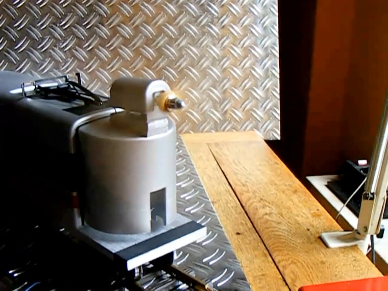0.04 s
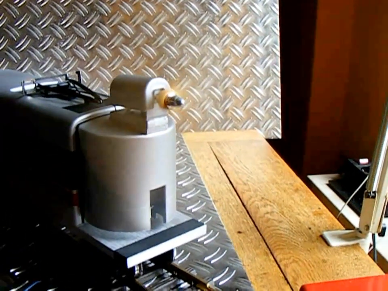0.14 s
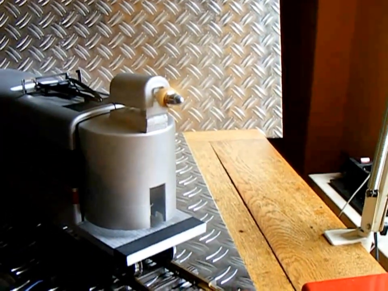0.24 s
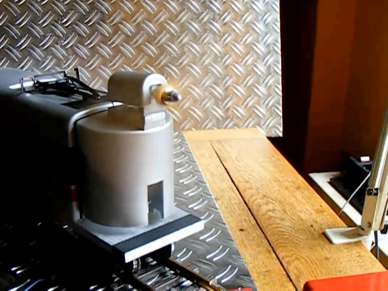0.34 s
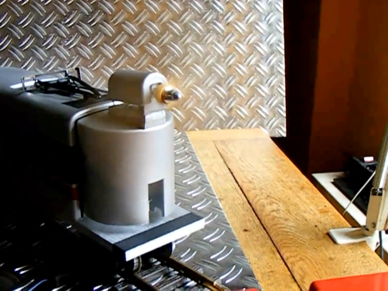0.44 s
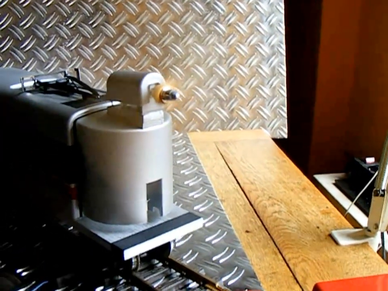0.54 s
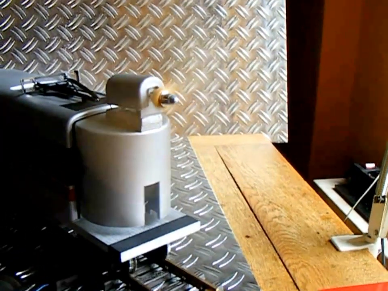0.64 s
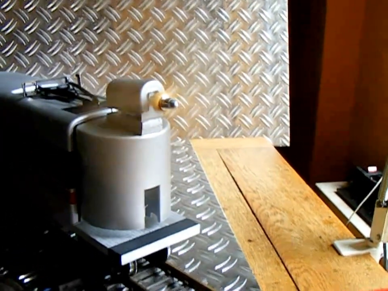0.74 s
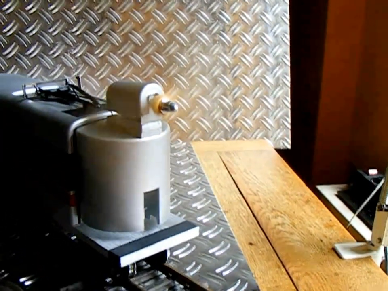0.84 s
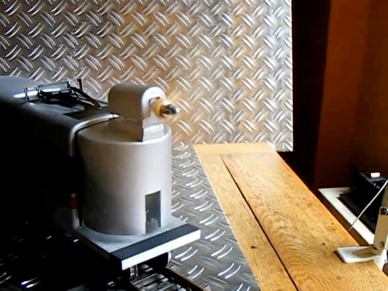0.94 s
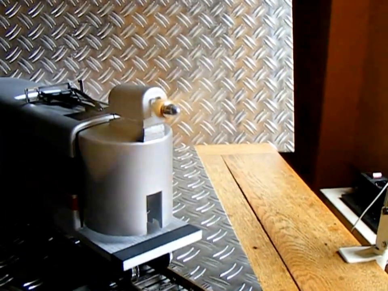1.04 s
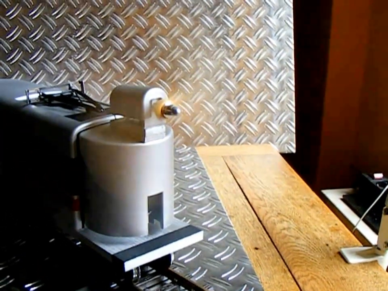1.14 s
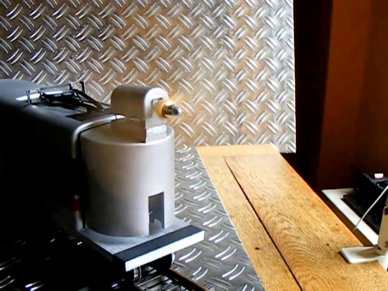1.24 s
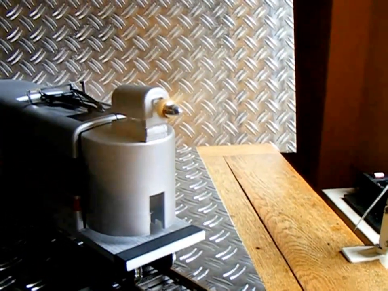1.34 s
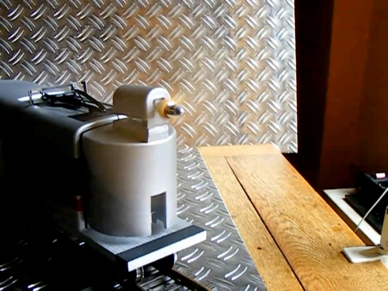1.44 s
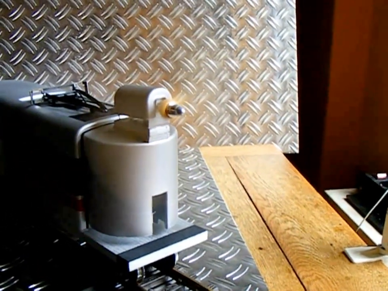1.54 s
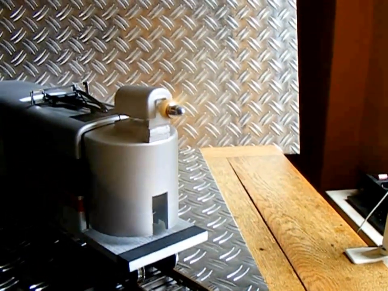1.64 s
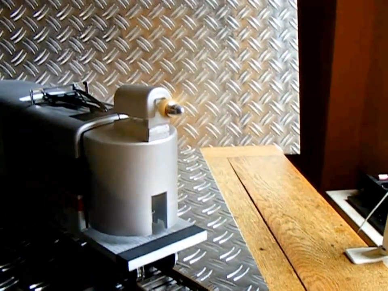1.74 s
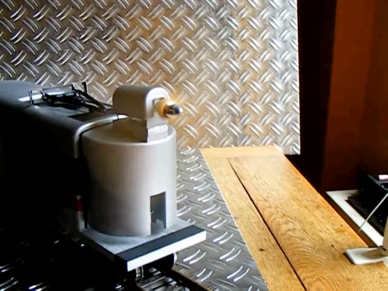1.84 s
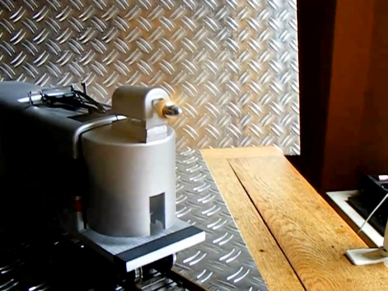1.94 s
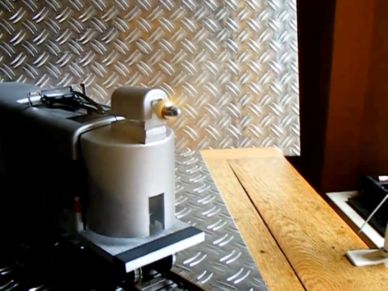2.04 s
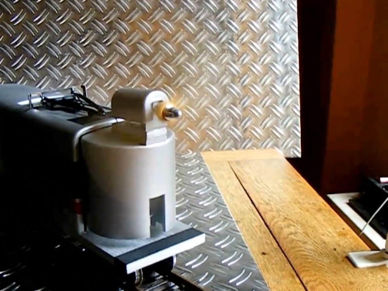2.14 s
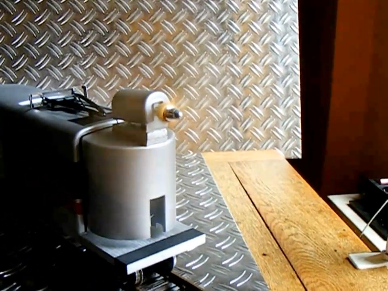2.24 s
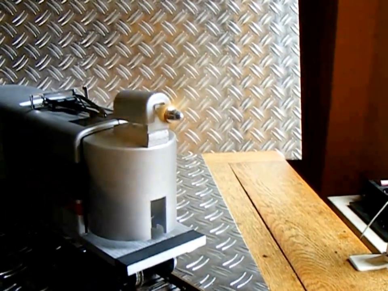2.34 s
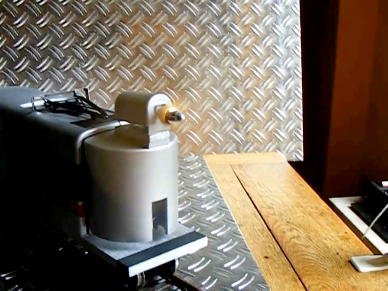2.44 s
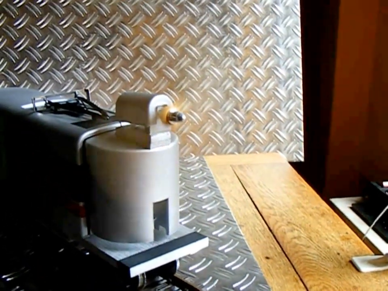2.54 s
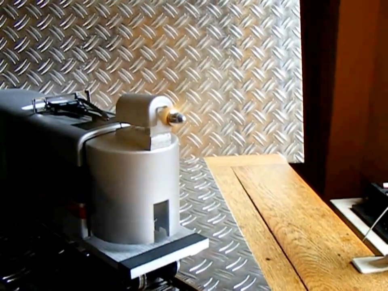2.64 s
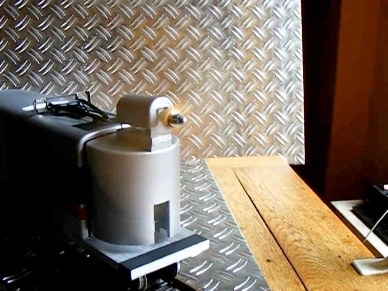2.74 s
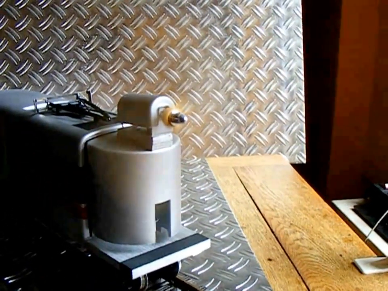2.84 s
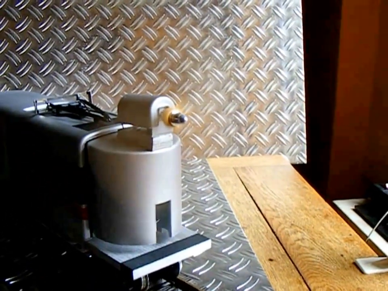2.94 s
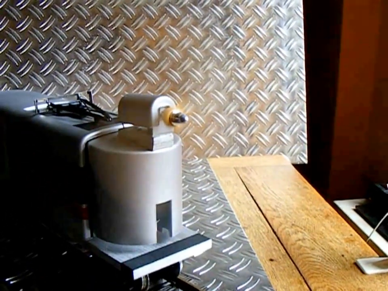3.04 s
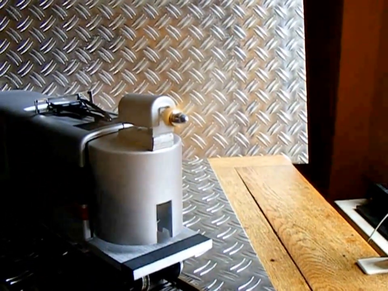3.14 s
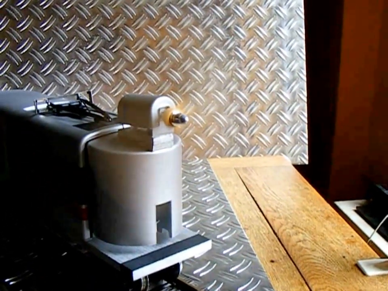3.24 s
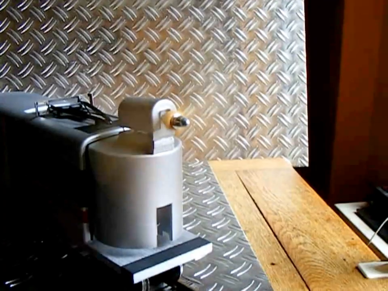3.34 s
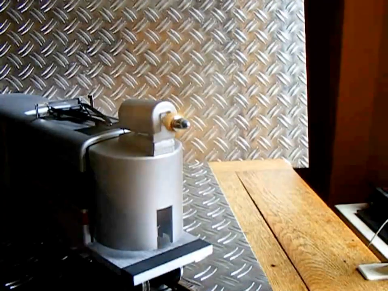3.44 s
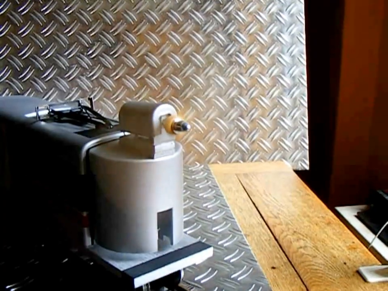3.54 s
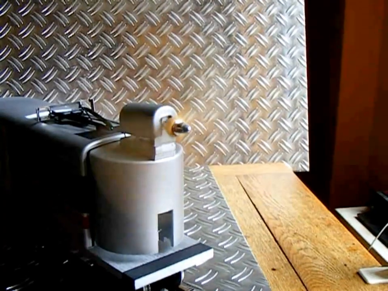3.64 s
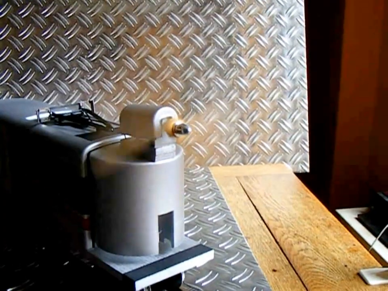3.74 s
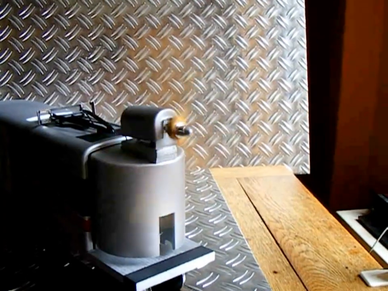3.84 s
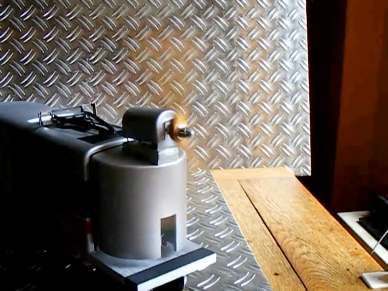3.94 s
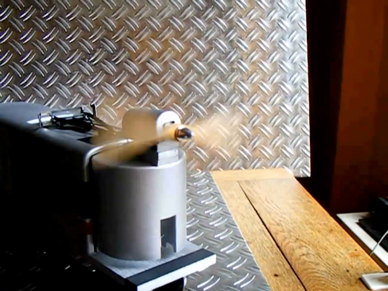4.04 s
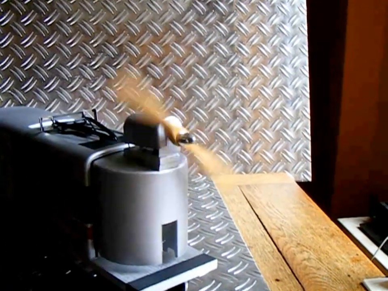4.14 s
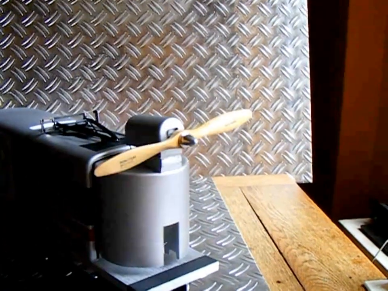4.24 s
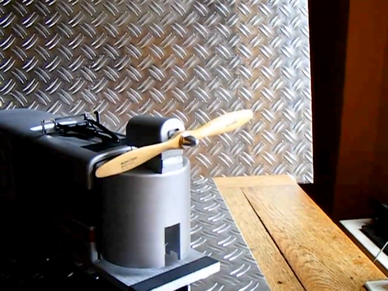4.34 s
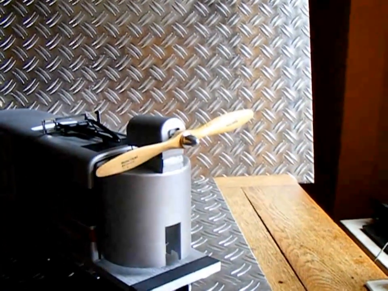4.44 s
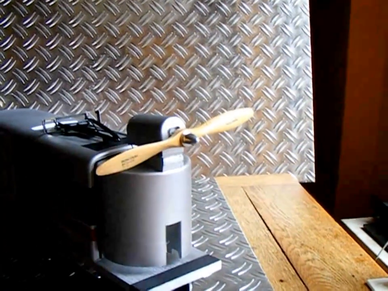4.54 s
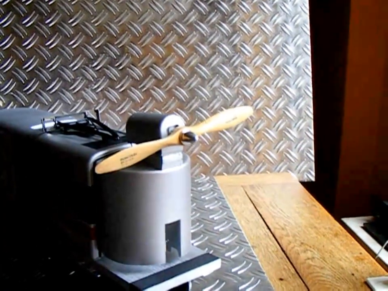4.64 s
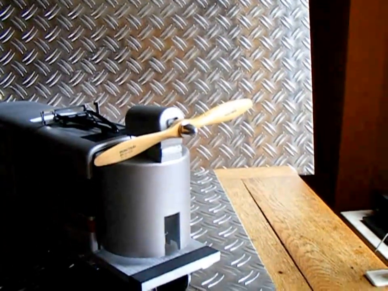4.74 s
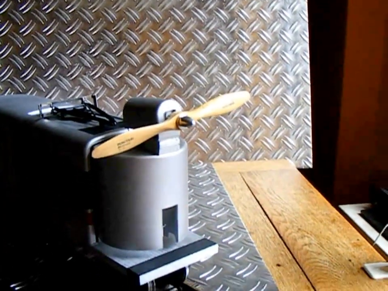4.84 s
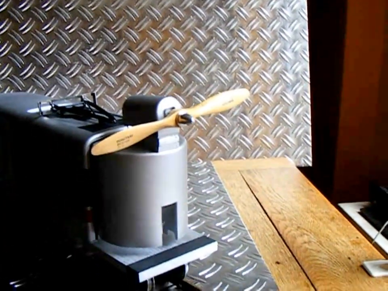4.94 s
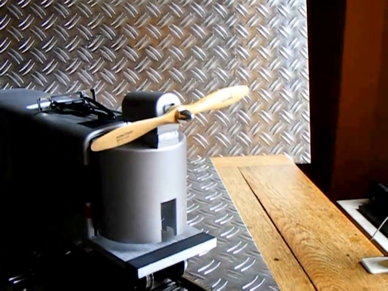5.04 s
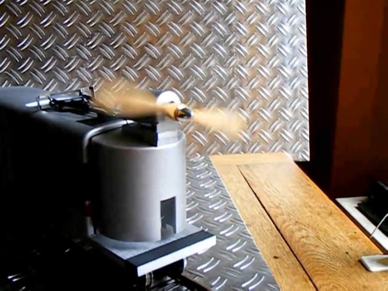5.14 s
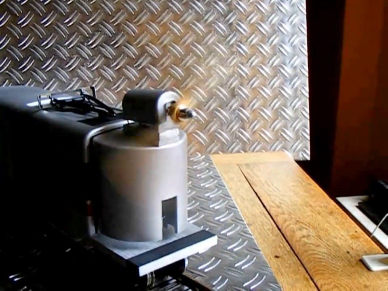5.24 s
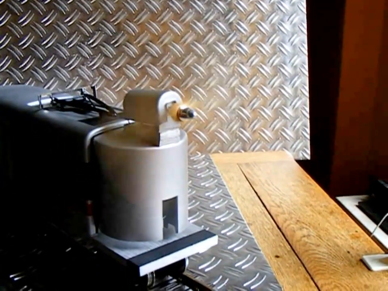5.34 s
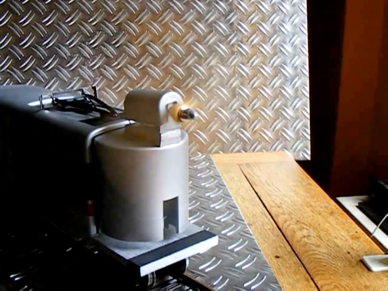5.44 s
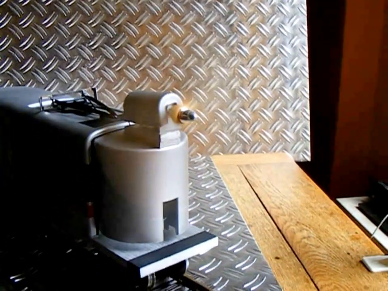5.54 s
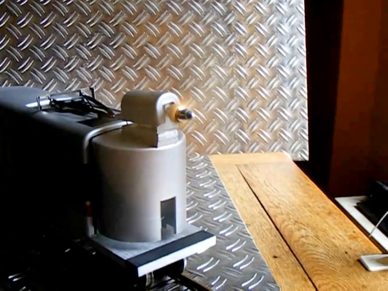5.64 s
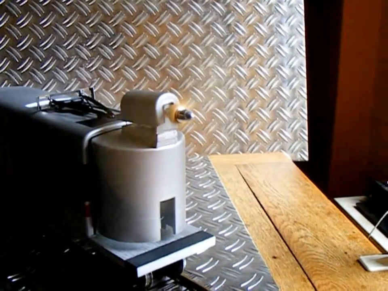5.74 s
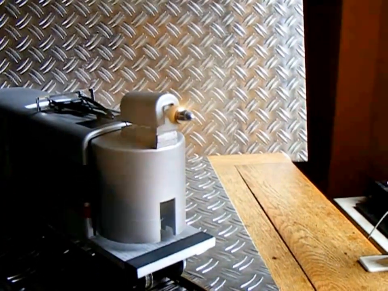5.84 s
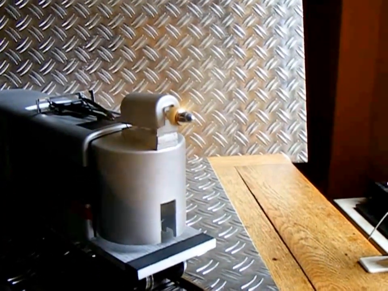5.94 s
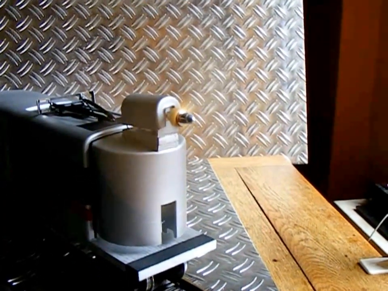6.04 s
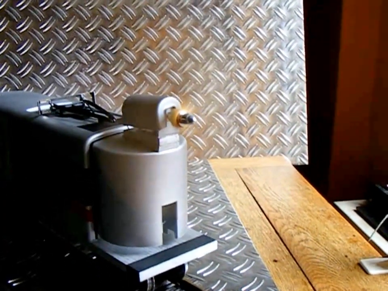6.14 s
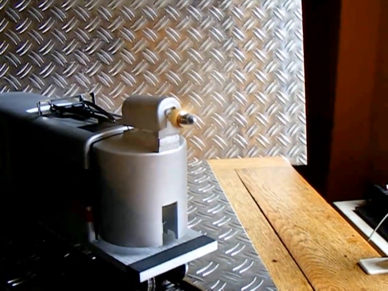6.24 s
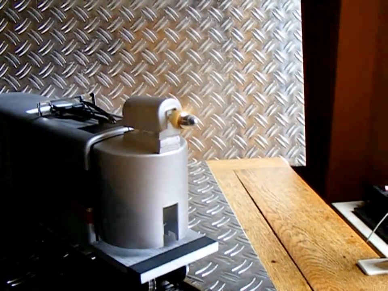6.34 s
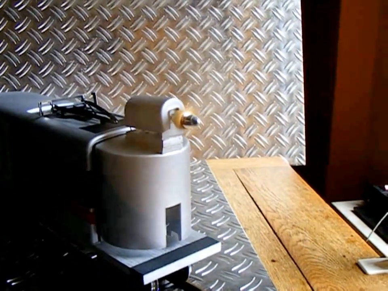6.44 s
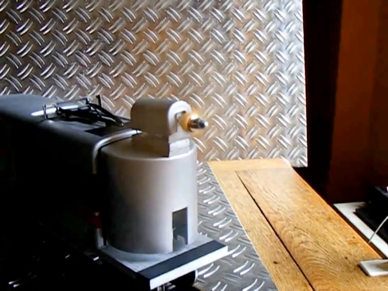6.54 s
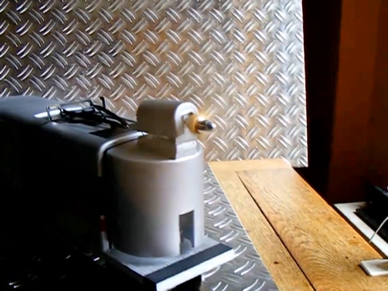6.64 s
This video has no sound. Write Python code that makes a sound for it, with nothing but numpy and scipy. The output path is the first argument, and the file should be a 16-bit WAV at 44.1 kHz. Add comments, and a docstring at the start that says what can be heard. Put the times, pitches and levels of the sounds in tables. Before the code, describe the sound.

A wooden propeller on a small electric motor is already running in a room, humming while its bearings rattle and its hollow body drones under a faint whine. The speed sags and rises in three swells before it slows to a stop with a tap. Light ticks, small scrapes and a sharp click fill the pause. Then the motor starts again, buzzing evenly and rising in pitch.

```python
"""A model railcar's electric motor spins a two-bladed wooden propeller in a room. Already at speed,
the blades hum under a thin whine; the unbalanced shaft shakes the hollow body and rattles its bearings.
It coasts, runs up again at 1.3 s and 2.4 s, then slows and stops with a tap at 4.1 s. The mechanism
ticks, scrapes and clicks. At 5.3 s the motor restarts; near 60 turns/s the shaft buzzes with one
knock a turn, then speeds up further."""
import sys
import numpy as np
from scipy import signal
from scipy.fft import rfft, irfft
from scipy.io import wavfile
from scipy.ndimage import uniform_filter1d

SR = 44100
rng = np.random.default_rng(int(sys.argv[2]) if len(sys.argv) > 2 else 0)


def file_out(sig):
    """Save sig as 16-bit WAV at sys.argv[1]."""
    # one column per channel
    cols = np.atleast_2d(sig).T
    # limit, then scale
    lim = np.clip(cols, -1, 1)
    pcm = np.round(lim * 32767).astype(np.int16)
    wavfile.write(sys.argv[1], SR, pcm)


N = 294588
TIME_S = np.arange(N) / SR

# Noise and contact spectra: freq_hz, relative_density_db
AIR_SPECTRUM = [(20, -25), (54, -7.5), (100, -12.5), (300, -17), (480, -19.5), (1100, -22.5), (2300, -26),
                (3900, -32), (5400, -39), (9000, -48.5), (11000, -76), (13200, -55), (15500, -57)]
RATTLE_SPECTRUM = [(150, -35), (260, 2), (380, -18), (700, -8), (1000, -2), (1300, -2.5), (1700, 3),
                   (2150, 2), (2700, -5.5), (3400, -9.5), (4200, -18.5), (5500, -35), (7300, -25),
                   (9000, -23.5), (10200, -44.5), (11000, -62), (13200, -26.5), (15500, -57.5)]
TAP_SPECTRUM = [(150, -42), (300, 12), (420, -22), (600, -7), (730, 5), (1500, 0.5), (2800, -1.5),
                (3400, -10.5), (4200, -22), (5800, -38), (8300, -17), (10500, -46), (13500, -31),
                (16000, -40)]
CLICK_SPECTRUM = [(150, -21), (550, -7.5), (1200, -17), (1750, 6.5), (2100, 4.5), (2700, -13), (3900, -9),
                  (5500, -33), (7200, -21), (9000, -24), (10500, -57), (13200, -36), (16000, -44)]
SCRAPE_SPECTRUM = [(200, -3), (1100, 1.5), (2200, 10.5), (3300, -7), (5500, -37), (9000, -14.5),
                   (10500, -50), (15000, -29)]
# Whine and a fainter high tone: start_s, end_s, whine_hz, faint_hz, converge_hz_per_s, level_db
WHINE_SPELLS = [(-0.5, 1.45, 4110, 6915, -10, -54.5), (1.45, 4.0, 4090, 6935, -38, -60),
                (4.975, 6.68, 3880, 7145, 200, -61.5)]
# Woody propeller tap, sharp clicks and light ticks of the mechanism: start_s, level_db
TAPS = [(4.119, -4.5)]
CLICKS = [(4.977, -3.5), (4.981, -7.5), (5.045, -17.5)]
TICKS = [(4.251, -24.5), (4.339, -22), (4.453, -22), (4.551, -26), (4.651, -24.5), (4.936, -13)]
# Mechanism scrapes: centre_s, half_width_s, level_db
SCRAPES = [(1.279, 0.023, -34.5), (3.895, 0.022, -38), (4.728, 0.04, -44.5), (4.932, 0.025, -31.5),
           (5.052, 0.035, -36.5), (5.19, 0.022, -44), (5.245, 0.014, -39.5), (5.348, 0.037, -37)]
# Dull shaft knocks: start_s, wall_db, body_db
THUMPS = [(1.287, 17, 14), (1.331, 15, 11), (5.359, 25.5, 12.5)]
# Motor runs: start_s, rattle_db, drone_db, boom_db, hum_db, hum_knee_rps, whirl_db, torque_db
RUNS = [(-0.5, -18.5, -15.5, -25, -29.5, 69, -1, 2), (1.289, -18, -16, -22.5, -30.5, 69.7, 4, 1.5),
        (2.43, -18, -16, -22, -28.5, 74.4, -0.5, 4.5), (5.34, -19, -16.5, -23.5, -26, 60.6, 6, -1.7)]
# Shaft speed under power, one curve per run: time_s, speed_rps
PULL_CURVES = [
    [(0.0, 69.8), (0.14, 71.3), (0.244, 74.2), (0.416, 80.4), (0.49, 83.8), (0.506, 83.8), (0.58, 78.6)],
    [(1.45, 47.1), (1.548, 63.6), (1.632, 71.0), (1.704, 75.5), (1.982, 69.6), (2.1, 69.9), (2.15, 68.1)],
    [(2.5, 42.4), (2.574, 51.3), (2.698, 67.2), (2.796, 71.6), (2.966, 59.4), (3.128, 71.7), (3.29, 74.2)],
    [(5.55, 40.6), (5.668, 49.0), (5.77, 54.2), (5.902, 56.8), (6.314, 59.9), (6.588, 82.7), (6.68, 85.2)],
]
# Locking into one knock a turn: time_s, share (0-1)
LOCK_CURVE = [(0, 0.03), (5.66, 0.13), (5.8, .55), (5.9, 0.88), (6.28, 0.88), (6.4, 0.45), (6.68, 0.3)]
# Shaft harmonics: order, level_db
BLADE_ORDERS = [(1, -20), (2, 2.5), (4, -1.5), (6, -7)]
BODY_ORDERS = [(3, -11), (4, -8.5)]
WALL_ORDERS = [(7, -4), (9, -2), (10, 1), (12, 0.5)]
BUZZ_ORDERS = [(4, 1), (5, -6.5), (6, -10.5), (7, -16.5), (8, -4), (9, -8.5), (10, 1.5), (11, 0), (12, 0),
               (13, -16), (14, -7), (15, -16), (16, -7), (17, -11.5), (19, -7)]
# Resonances: freq_hz, width_hz, gain_db
BODY_MODES = [(179.8, 6.6, 8.5), (227, 13.5, 9.5), (260.4, 21.4, 9.5), (322, 30, 3.5)]
WALL_MODES = [(475, 96, -14.5), (564.7, 23.5, -1), (615, 29.2, 4.5), (689.5, 29.8, 4), (907, 28, -11)]
STANDING_WAVES = [(138.8, 5.3, -3), (155.3, 9.3, -3.5), (164.4, 8, -11)]
# Band subtracted from the once-a-turn knock: freq_hz, width_hz, gain_db
KNOCK_NOTCH = [(1300, 300, -1.5)]

AIR_DB, REVERB_DB, REVERB_T60_S = -45, -11, 0.33
SURGE_DB, SURGE_S = 14, 0.06
COAST_S, FRICTION_RPS = 0.49, 6.0
CRITICAL_RPS, CRITICAL_WIDTH_RPS = 50.6, 2.7
HARD_PULL_RPS_PER_S, UNLOADING_RPS_PER_S, UNLOADED_DB = 280, 125, -0.83


def from_db(db):
    """Decibels to gain."""
    return 10 ** (np.asarray(db) / 20)


def unit_rms(x):
    """Scale to unit rms."""
    return x / np.sqrt(np.mean(x ** 2) + 1e-20)


def evened(x, size=4001):
    """Hold short-term rms near 1."""
    power = uniform_filter1d(uniform_filter1d(x ** 2, size), size)
    return x / np.sqrt(np.abs(power) + 1e-4 * np.mean(x ** 2))


def curve(rows):
    """Interpolate (time_s, value) rows per sample."""
    return np.interp(TIME_S, *np.transpose(rows))


def drift(rate_hz):
    """Smooth random wander, unit rms."""
    hop = 40
    pole = np.exp(-2 * np.pi * hop * rate_hz / SR)
    noise = rng.standard_normal(N // hop + 2002)
    slow = signal.lfilter([1], [1, -2 * pole, pole * pole], noise)[2000:]
    return np.interp(np.arange(N) / hop, np.arange(len(slow)), unit_rms(slow))


def impulses(rows):
    """One impulse per (start_s, level_db) row."""
    out = np.zeros(N)
    for start_s, level_db in rows:
        out[round(start_s * SR)] += from_db(level_db)
    return out


def coloured(x, spectrum, size=4096):
    """Minimum-phase, unit-energy filter with the given spectrum."""
    hz, db = np.transpose(spectrum)
    grid_hz = np.maximum(np.fft.rfftfreq(size, 1 / SR), 1)
    gain = from_db(np.interp(np.log(grid_hz), np.log(hz), db))
    cepstrum = irfft(np.log(gain))
    cepstrum[1:size // 2] *= 2
    cepstrum[size // 2 + 1:] = 0
    response = irfft(np.exp(rfft(cepstrum)))
    return signal.fftconvolve(x, response / np.linalg.norm(response))[:N]


def softened(x, cut_hz):
    """Soft contact: low-pass."""
    return signal.sosfilt(signal.butter(2, cut_hz, fs=SR, output="sos"), x + 1e-18)


def resonate(force, modes):
    """Parallel resonances, alternating signs."""
    out = 0
    for k, (freq_hz, width_hz, gain_db) in enumerate(modes):
        radius = np.exp(-np.pi * width_hz / SR)
        poles = [1, -2 * radius * np.cos(2 * np.pi * freq_hz / SR), radius ** 2]
        ring = signal.lfilter([1, 0, -1], poles, force + 1e-18) * (1 - radius ** 2) / 2
        out += (-1) ** k * from_db(gain_db) * ring
    return out


def room(x):
    """Direct sound plus dense, decaying reflections after 3 ms."""
    t = TIME_S[:SR // 2]
    tail = rng.standard_normal(len(t)) * from_db(-60 * t / REVERB_T60_S) * (t > 0.003)
    return x + from_db(REVERB_DB) * signal.fftconvolve(x, tail / np.linalg.norm(tail))[:N]


def room_air():
    """Quiet, steady rush of the room."""
    return from_db(AIR_DB) * unit_rms(coloured(rng.standard_normal(N), AIR_SPECTRUM))


def whine():
    """Thin, hissy whine near 4 kHz, with a fainter tone near 7 kHz gliding the opposite way."""
    out = 0
    for start_s, end_s, whine_hz, faint_hz, converge_hz_per_s, base_db in WHINE_SPELLS:
        age_s = np.maximum(TIME_S - start_s, 0)
        shift_hz = converge_hz_per_s * age_s + 140 * drift(220)
        cycles = np.cumsum([whine_hz + shift_hz, faint_hz - shift_hz], axis=1) / SR
        tone, faint = np.sin(2 * np.pi * cycles)
        level_db = base_db + SURGE_DB * np.exp(-age_s / SURGE_S) + 3 * drift(60) + 2 * drift(4)
        active = (TIME_S > start_s) & (TIME_S < end_s)
        out += active * from_db(level_db) * (tone + from_db(-7) * faint)
    return out


def strikes(rows, spectrum, fade_s, chatter_db):
    """Hard contacts, each followed by brief chatter of the parts."""
    t = TIME_S[:SR // 20]
    chatter = rng.standard_normal(len(t)) * np.exp(-t / fade_s)
    contact = from_db(chatter_db) * chatter / np.linalg.norm(chatter) + (t == 0)
    return coloured(signal.fftconvolve(impulses(rows), contact)[:N], spectrum)


def shaft_thumps():
    """Dull knocks ring walls and body, with a faint hard edge."""
    on_walls = impulses([(start_s, wall_db) for start_s, wall_db, _ in THUMPS])
    on_body = impulses([(start_s, body_db) for start_s, _, body_db in THUMPS])
    ring = resonate(on_walls, WALL_MODES) + resonate(on_body, BODY_MODES)
    return softened(ring, cut_hz=1500) + from_db(-42) * coloured(on_walls, RATTLE_SPECTRUM)


def contacts():
    """Parts rub and strike while the propeller is slow or still."""
    rubbing = sum(from_db(level_db) * np.exp(-((TIME_S - centre_s) / half_width_s) ** 2)
                  for centre_s, half_width_s, level_db in SCRAPES)
    scrapes = coloured(rubbing * rng.standard_normal(N), SCRAPE_SPECTRUM)
    tap = strikes(TAPS, TAP_SPECTRUM, fade_s=0.007, chatter_db=9.5)
    clicks = from_db(4.5) * strikes(CLICKS, CLICK_SPECTRUM, fade_s=0.003, chatter_db=3)
    ticks = strikes(TICKS, SCRAPE_SPECTRUM, fade_s=0.003, chatter_db=3)
    return room(scrapes + tap + clicks + ticks + shaft_thumps())


def shaft_speed_rps():
    """Each run pulls the shaft, then drag and bearing friction slow it; the tap stops it dead."""
    rps = np.zeros(N)
    for (start_s, *_), pull in zip(RUNS, PULL_CURVES):
        shut_s, shut_rps = pull[-1]
        pulled = curve([(start_s, np.interp(start_s, TIME_S, rps)), *pull])
        coasting = (shut_rps + FRICTION_RPS) * np.exp((shut_s - TIME_S) / COAST_S) - FRICTION_RPS
        run_rps = np.where(TIME_S < shut_s, pulled, np.maximum(coasting, 0))
        rps = np.where(TIME_S < start_s, rps, run_rps)
    stop_s, restart_s = TAPS[0][0], RUNS[-1][0]
    return rps * ((TIME_S < stop_s) | (TIME_S > restart_s))


def growth_db(rps, db_per_rps, knee_rps, width_rps=2.9):
    """Level climbs with speed, flattening to 0 dB past the knee."""
    return -db_per_rps * width_rps * np.logaddexp(0, (knee_rps - rps) / width_rps)


def motor_levels_db(rps):
    """Per-run levels, shifted by speed, torque and shaft whirl at the critical speed."""
    starts_s, *columns = np.transpose(RUNS)
    run = np.searchsorted(starts_s, TIME_S) - 1
    settings = [uniform_filter1d(column[run], size=4001) for column in columns]
    rattle_db, drone_db, boom_db, hum_db, hum_knee_rps, whirl_db, torque_db = settings
    accel_rps_per_s = uniform_filter1d(np.gradient(rps) * SR, size=3001)
    torque_db *= np.tanh(accel_rps_per_s / HARD_PULL_RPS_PER_S)
    unloaded_db = UNLOADED_DB * np.clip(-accel_rps_per_s / UNLOADING_RPS_PER_S, 0, 1) ** 2
    whirl_db *= np.exp(-((rps - CRITICAL_RPS) / CRITICAL_WIDTH_RPS) ** 2)
    rattle_db += growth_db(rps, db_per_rps=0.7, knee_rps=54.4) + torque_db + unloaded_db
    drone_db += growth_db(rps, db_per_rps=0.52, knee_rps=57.6) + whirl_db + 0.49 * torque_db
    boom_db += growth_db(rps, db_per_rps=0.53, knee_rps=59.6) + 0.88 * whirl_db
    hum_db += growth_db(rps, db_per_rps=0.6, knee_rps=hum_knee_rps)
    return rattle_db, drone_db, boom_db, hum_db


def shaft_tones(turns, orders, rough, flutter_hz, scatter_turns=1):
    """Wavering shaft harmonics; low scatter sums them to one pulse a turn."""
    out = 0
    for order, level_db in orders:
        angle = 2 * np.pi * (order * turns + scatter_turns * rng.random())
        in_phase = (1 + rough * drift(flutter_hz)) * np.sin(angle)
        quadrature = rough * drift(flutter_hz) * np.cos(angle)
        out += from_db(level_db) * (in_phase + quadrature)
    return out


def loose_knocks(rps, turns, per_turn=9):
    """Random bearing hits over noise: denser with speed, swelling once a turn."""
    hits = rng.random(N) < per_turn * np.maximum(rps, 20) / SR
    knocks = evened(hits * rng.standard_normal(N).clip(-1, 1))
    force = knocks + from_db(4.5) * rng.standard_normal(N)
    return force * from_db(1.1 * drift(15) + 0.85 * np.sin(2 * np.pi * turns))


def locked_knocks(turns, fade_turns=0.17, chatter=0.2, variety=0.5, size=760):
    """One hard strike a turn, then softer chatter, much alike each time."""
    phase = (turns + 0.5) % 1
    repeated = rng.standard_normal(size)[(phase * size).astype(int)]
    envelope = np.exp(-phase / fade_turns) + chatter
    return evened(envelope * (repeated + variety * rng.standard_normal(N)))


def blade_hum(turns):
    """Blade tones, swelled and cancelled in turn by standing waves."""
    blades = shaft_tones(turns, BLADE_ORDERS, rough=0.25, flutter_hz=8.8)
    return blades + resonate(blades, STANDING_WAVES)


def body_boom(turns, loose, steady):
    """The hollow body booms as orders 3 and 4 cross its modes; loose knocks add rumble."""
    sway = resonate(shaft_tones(turns, BODY_ORDERS, rough=0.13, flutter_hz=22), BODY_MODES)
    rumble = from_db(2 - 15 * steady ** 2) * evened(resonate(loose, BODY_MODES))
    return steady * sway + rumble


def wall_drone(turns, loose, steady, lock, free):
    """Shaft orders sweep the wall modes, knocks add clatter; a locked shaft buzzes instead."""
    singing = shaft_tones(turns, [(8, 0)], rough=0.2, flutter_hz=12)
    force = from_db(6.5) * singing + shaft_tones(turns, WALL_ORDERS, rough=0.54, flutter_hz=24.8)
    tones = evened(resonate(force, WALL_MODES))
    clatter = evened(room(resonate(loose, WALL_MODES)))
    clatter += from_db(1) * evened(resonate(rng.standard_normal(N), [(558, 260, 0)]))  # damped mode
    drone = evened(steady * tones + from_db(-8.5) * softened(clatter, cut_hz=1570))
    buzz = unit_rms(shaft_tones(turns + 0.4, BUZZ_ORDERS, rough=0.22, flutter_hz=14, scatter_turns=0.3))
    return free ** 2 * drone + lock * (from_db(2.5) * buzz + from_db(-15.5) * clatter)


def bearing_rattle(turns, loose, lock, free):
    """Random knocks give way to one a turn; a thin, wavering 13 kHz sizzle follows the rattle's level."""
    regular = unit_rms(coloured(locked_knocks(turns), RATTLE_SPECTRUM))
    regular = unit_rms(regular - resonate(regular, KNOCK_NOTCH))
    irregular = evened(room(coloured(loose, RATTLE_SPECTRUM)))
    treble = signal.butter(2, [12500, 14400], "band", fs=SR, output="sos")
    sizzle = from_db(-30.5 + 2.2 * drift(6)) * unit_rms(signal.sosfilt(treble, loose))
    return free ** 1.4 * irregular + lock * regular + sizzle


def motor():
    """One shaft drives bearings, body, walls and blades."""
    rps = shaft_speed_rps()
    turns = np.cumsum(rps) / SR
    rattle_db, drone_db, boom_db, hum_db = motor_levels_db(rps)
    lock = curve(LOCK_CURVE)
    free = np.sqrt(1 - lock ** 2)
    steady = np.maximum(np.clip(rps / 70, 0, 1) ** 4, lock)  # shaft forces outweigh knocks at speed
    stirred = np.clip(rps / 40, 0, 1) ** 0.56  # a slow shaft barely stirs the walls
    loose = loose_knocks(rps, turns)
    rattle = from_db(rattle_db) * bearing_rattle(turns, loose, lock, free)
    boom = from_db(boom_db) * body_boom(turns, loose, steady)
    drone = from_db(drone_db) * wall_drone(turns, loose, steady, lock, free)
    hum = from_db(hum_db) * blade_hum(turns)
    return np.clip(rps / 12, 0, 1) * (rattle + boom + stirred * drone + hum)


def scene():
    """Railcar over room air, mono."""
    return (room_air() + motor() + whine() + contacts())[None]


def record(dry):
    """Soft clip, converter offset, steep low-pass."""
    ceiling, dc_offset, cutoff_hz = 1.3, -0.016, 15700
    lowpass = signal.ellip(10, 0.1, 80, cutoff_hz, fs=SR, output="sos")
    return signal.sosfilt(lowpass, ceiling * np.tanh(dry / ceiling) + dc_offset)


dry = scene()
out = record(dry)
file_out(out)
```